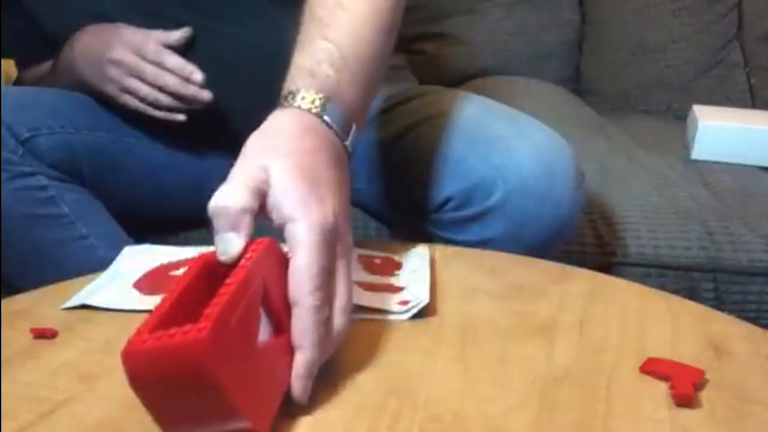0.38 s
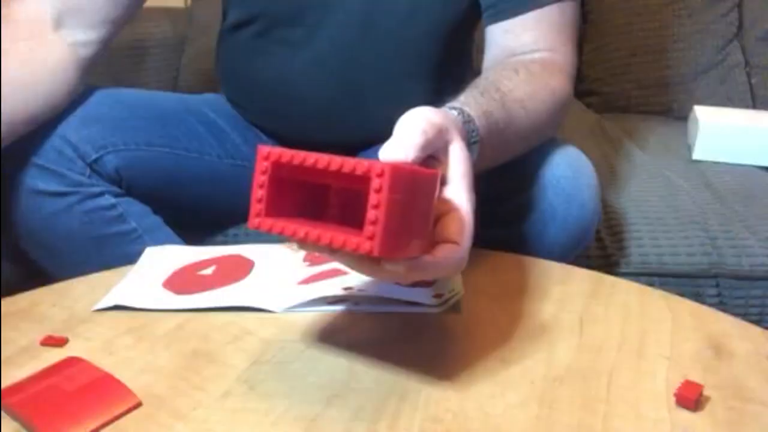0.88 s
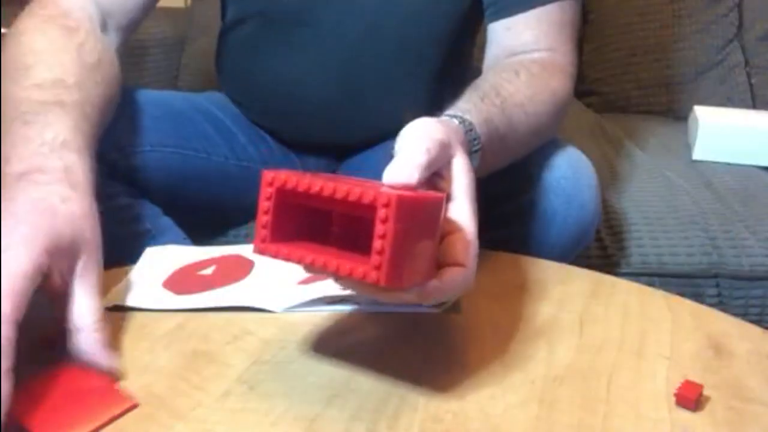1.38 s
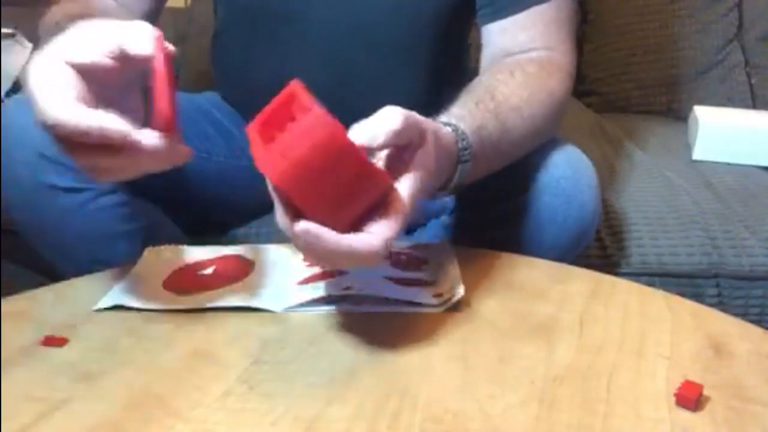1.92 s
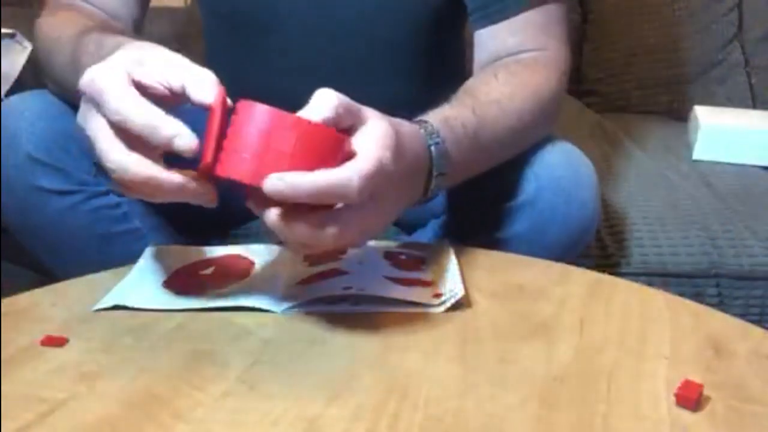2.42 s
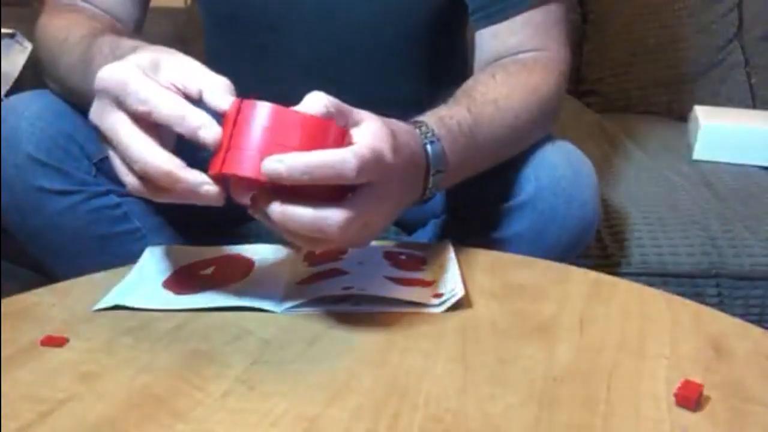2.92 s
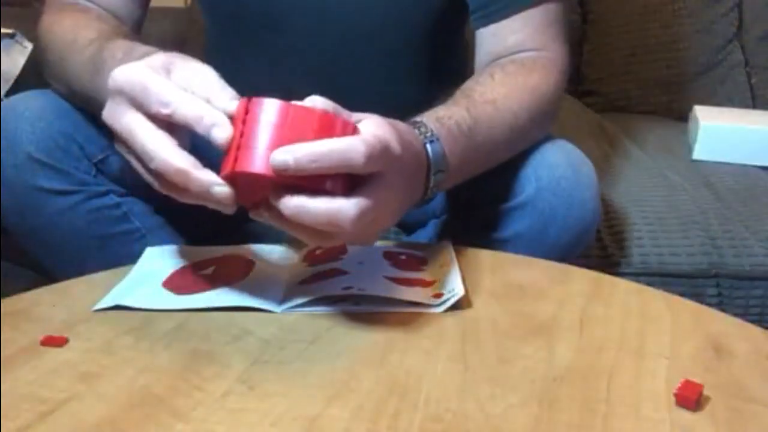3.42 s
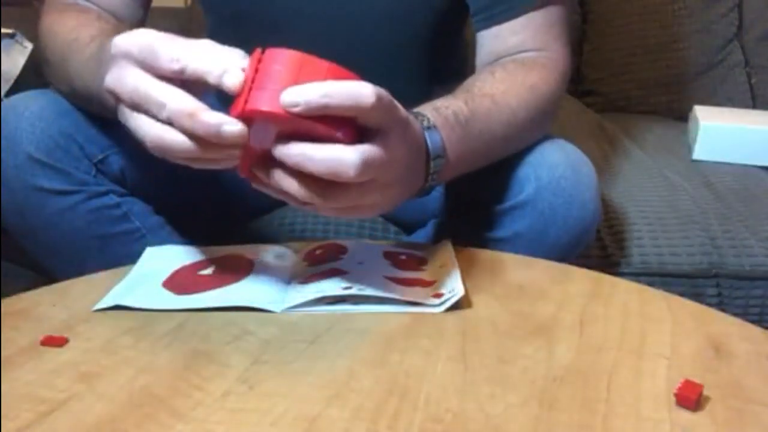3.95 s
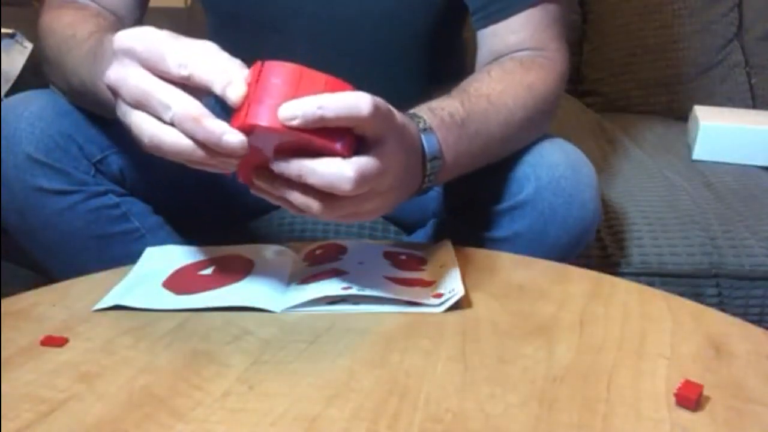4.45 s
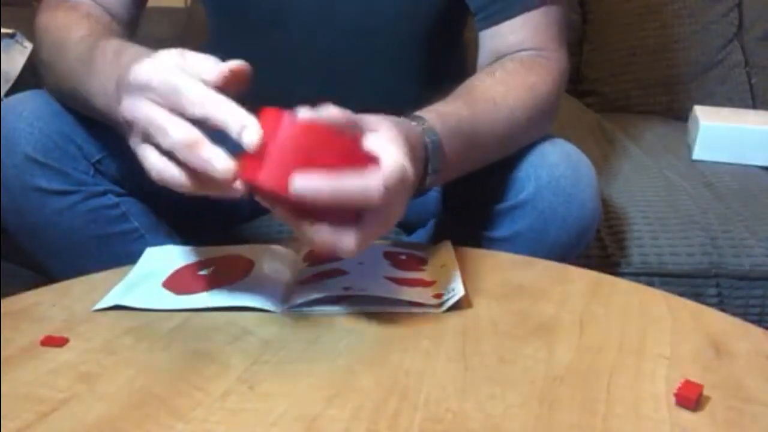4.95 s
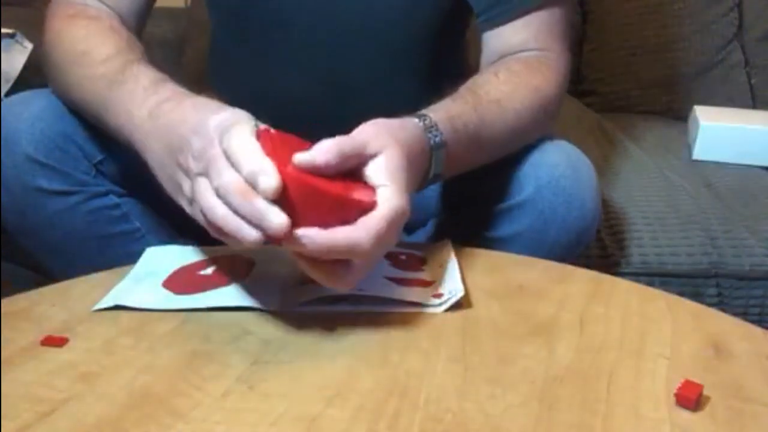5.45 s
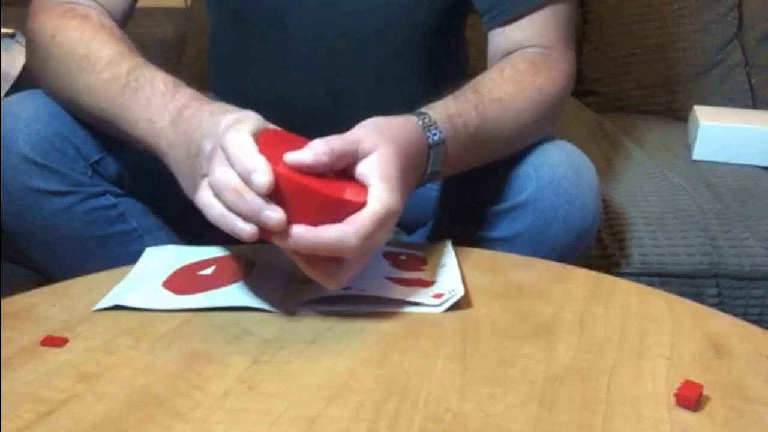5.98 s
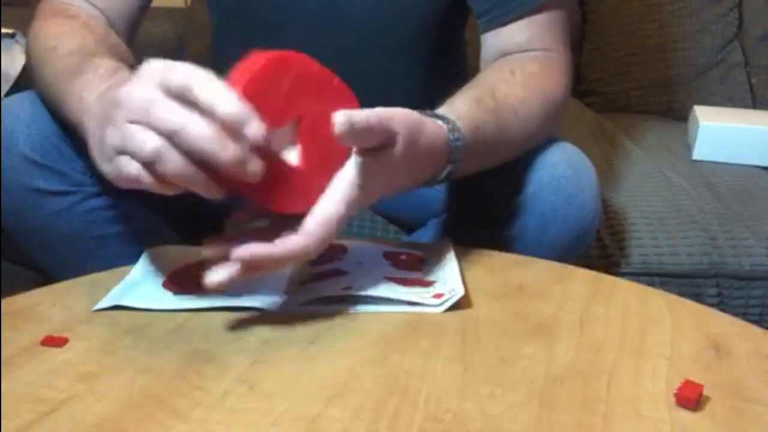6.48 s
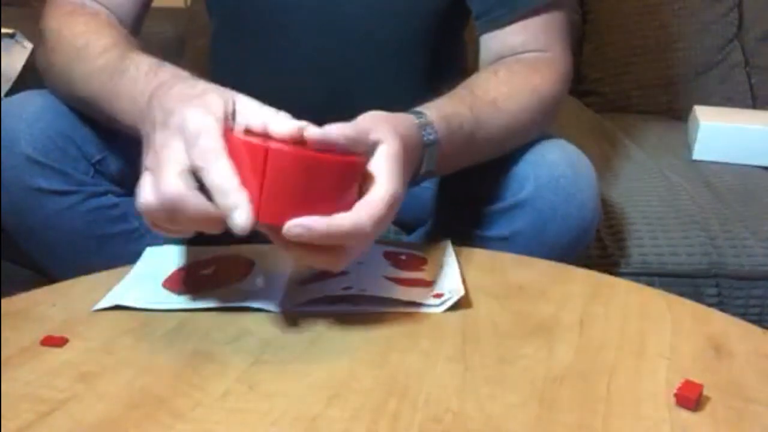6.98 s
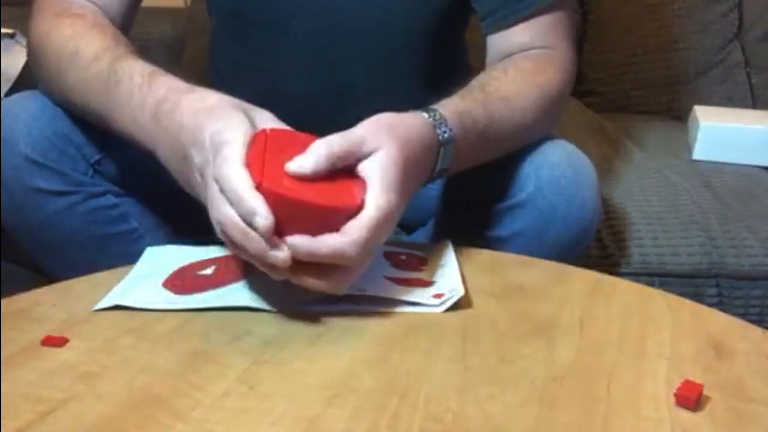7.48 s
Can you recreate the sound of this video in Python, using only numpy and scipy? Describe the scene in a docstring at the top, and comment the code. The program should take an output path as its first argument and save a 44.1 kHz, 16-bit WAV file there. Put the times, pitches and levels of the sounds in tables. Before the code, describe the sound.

A hollow plastic brick box knocks onto a wooden table, a plate rattles off, then studs click and fingers rub and squeak indoors.

```python
"""Hollow box of plastic building bricks: hands set it on a wooden table, slide a brick plate off it and press
the plate onto it. Short pushes ring the modes of table and box; dense small catches ring them as plastic
rocks and fingers rub. Squeaks are sums of partials with an unsteady slip rate, brushing is coloured grains.
Rumble (noise through room resonances) swells over a steady hiss; both step up 15 dB shortly before 1 s.
Faint low noise bands sound early on; the contacts echo in a living room."""
import sys
import numpy as np
from scipy import signal
from scipy.fft import rfft, irfft
from scipy.io import wavfile

SR = 44100
rng = np.random.default_rng(int(sys.argv[2]) if len(sys.argv) > 2 else 0)


def voltage_ratio(level):
    """Linear amplitude factor for a level in decibels (scalar or array-like)."""
    return 10 ** (np.asarray(level, float) / 20)


def int16_out(signal):
    """Quantize to a 16-bit WAV file."""
    q = np.round(np.clip(np.atleast_2d(signal).T, -1, 1) * 32767)
    wavfile.write(sys.argv[1], SR, q.astype(np.int16))


N = 336042   # samples

# Rumble, mainly under 170 Hz, level after the step: (time [s], level [dB])
RUMBLE = [(0.0, -53.5), (0.25, -65.5), (0.8, -56), (0.95, -58), (1.06, -65.5), (1.25, -44.5), (1.62, -51.5),
          (2.12, -55), (2.3, -68), (2.43, -62), (2.49, -61), (2.63, -56.5), (2.87, -53), (3.2, -68.5),
          (3.4, -68), (3.55, -60.5), (3.8, -64.5), (3.95, -55.5), (4.22, -52), (4.52, -46.5), (4.92, -61),
          (5.08, -46.5), (5.2, -75), (5.4, -51.5), (5.55, -58.5), (5.82, -45), (6.07, -56), (6.17, -66),
          (6.28, -47.5), (6.43, -77.5), (6.6, -71), (7.13, -56.5), (7.45, -55.5), (7.62, -92)]
# Room resonances, low and middle: (frequency [Hz], width [Hz], level [dB])
LOW_ROOM = [(43.6, 12, -25.5), (61.8, 8.3, -7), (77.5, 9.8, -6), (103.3, 6.7, 0), (127.1, 24, -1),
            (158.3, 12, -9.5)]
MID_ROOM = [(175, 77, -7), (209.5, 5.2, 2), (245, 71, -4), (297.5, 40, -0.5), (351, 27, -5),
            (490, 180, -10)]
# Hiss spectrum, relative: (frequency [Hz], density [dB per Hz])
HISS_SPECTRUM = [(24, -40.5), (40, -12), (81, -1), (115, -3.5), (249, -16.5), (297, -13.5), (831, -18.5),
                 (1210, -19.5), (2210, -27), (4340, -27.5), (7730, -30), (14800, -42.5), (16000, -46)]
# Swell of the faint low bands: (strongest [s], 20 dB rise [s], 20 dB fall [s], level [dB])
FAINT_BANDS_SWELL = [(.11, 0.094, 0.69, -77)]
# Faint low bands of noise: (frequency [Hz], level [dB], t60 [s])
FAINT_BANDS = [(398, -0.5, 0.043), (570, -6, .04), (690, -2.5, .05), (1200, -7, .02)]
# Skin and cloth brushing: (strongest [s], 20 dB rise [s], 20 dB fall [s], level [dB])
BRUSH = [(.23, 0.084, 0.09, -77.5), (.474, 0.074, 0.036, -80.5), (1.96, 0.33, 0.23, -63.5),
         (3.56, .05, .5, -73.5), (3.93, 0.17, 0.58, -69.5), (4.995, 0.062, .03, -60),
         (5.113, 0.025, 0.018, -54.5), (5.17, .04, 0.16, -68), (5.3, 0.064, 0.22, -65),
         (5.37, 0.13, 0.12, -66), (5.43, 0.13, 0.046, -66), (6.2, 0.18, 0.15, -62),
         (6.31, 0.078, 0.25, -65), (6.47, 0.038, .15, -70.5), (6.55, 0.12, 0.28, -59),
         (6.64, .15, 0.07, -66), (6.7, 0.07, 0.29, -68.5), (6.822, 0.026, 0.0092, -53),
         (7.0, 0.092, 0.1, -71), (7.125, 0.23, 0.053, -61.5), (7.28, 0.4, 0.57, -66)]
# Brushing spectrum, relative: (frequency [Hz], density [dB per Hz])
BRUSH_SPECTRUM = [(1500, -1.5), (3000, -8.5), (4000, 1.5), (5300, 0.5), (7000, 0), (10000, -10.5),
                  (15000, -15.5)]
# Plastic landing on the table:
# (time [s], level [dB], tilt under 700 Hz [dB], treble tilt [dB], brightest pitch [kHz])
KNOCKS = [(0.379, -43, 0, -8, 4), (0.382, -28.5, 1.5, -18, 8.5), (0.3858, -44.5, 6, -34, 3.7),
          (.404, -55, 22, -33, 4), (0.5708, -16.5, -6.5, -30.5, 4.8), (.5735, -28, -5, -31.5, 4),
          (0.5795, -37, 14, -24, 7.4), (.5875, -38, 12, -28.5, 3.8), (.675, -76, -7, -26, 4.4),
          (0.7206, -75, 9, -27, 4), (1.4425, -38.5, -10, -4, 4.1), (1.447, -41, -15, -15, 6.1),
          (1.4515, -47, -20, 2.5, 3.9), (1.4615, -56, -13, -6, 7.6), (1.455, -32.5, -3, -5, 5),
          (1.458, -30.5, -2, -11, 5.5), (1.463, -43, -18, -14, 2.5), (1.4655, -32.5, -2, -7, 4.5),
          (1.469, -27, -39, -19, 5.6), (1.4725, -46, -8, -20, 5), (1.4785, -36.5, 3, -30, 4),
          (1.489, -46, 10.5, -25, 4), (1.511, -68, 7, -25, 4)]
# Modes of the table top with the box on it, when struck: (frequency [Hz], level [dB], t60 [s])
TABLE_MODES = [(97.5, -20.5, 0.057), (159, -21.5, 0.18), (213, -11.5, 0.046), (290, -3, 0.064),
               (339, -9, 0.043), (402, -7, 0.066), (489, 0.5, 0.073), (525.5, -1.5, 0.061),
               (675, -13, 0.024), (860, -22.5, 0.025), (1070, -17.5, 0.071), (1152, -16, 0.071),
               (1200, -21.5, 0.036), (1270, 5, 0.011), (1380, -14.5, 0.045), (1575, -34, 0.096),
               (2007, -25, 0.022), (2270, -27.5, 0.014), (2420, 1, 0.0072), (3160, 0.5, 0.0035),
               (4016, -0.5, 0.0083), (4450, 0, 0.0041), (5590, -5, 0.013), (6840, -0.5, 0.0062),
               (9300, -12.5, 0.0022)]
# Plastic rocking and sliding on the table:
# (strongest [s], 20 dB rise [s], 20 dB fall [s], middle level [dB], bass level [dB])
ROCK = [(.48, 0.14, 0.21, -69, -59.5), (1.358, 0.02, 0.035, -60, -50.5), (1.447, 0.012, 0.038, -49, -64),
        (1.465, 0.03, 0.022, -36.5, -56), (1.5, 0.031, 0.06, -55.5, -39)]
# Fingers and plate dragging over the box walls:
# (strongest [s], 20 dB rise [s], 20 dB fall [s], wall tone before lumps [dB], squeaky treble [dB])
RUB = [(1.89, 0.11, 0.33, -71, -71), (2.09, 0.12, 0.15, -65, -84), (2.27, 0.079, 0.32, -71.5, -88),
       (4.997, 0.033, 0.011, -73, -65.5), (5.08, 0.044, 0.082, -75, -70), (5.37, 0.56, 0.25, -66.5, -87),
       (5.56, 0.036, 0.084, -66, -80), (5.655, 0.06, 0.08, -68, -87), (6.198, 0.066, 0.014, -55.5, -64),
       (6.303, 0.03, 0.16, -55.5, -66), (6.528, 0.074, 0.057, -51, -55), (6.59, 0.021, 0.062, -49.5, -62),
       (6.65, 0.058, 0.038, -56, -58), (6.72, 0.059, 0.1, -52, -62), (6.765, 0.035, .03, -61.5, -77),
       (6.822, 0.033, 0.025, -50.5, -47), (7.042, 0.15, 0.11, -58, -61.5), (7.116, 0.02, 0.024, -47, -49.5),
       (7.27, 0.2, 0.08, -71, -63.5)]
# Modes of the box, ungripped: (frequency [Hz], level [dB], t60 [s])
BOX_MODES = [(344, -28, 0.03), (537, -38, 0.03), (634, 2.5, 0.032), (764, -4.5, 0.043), (910, 3.5, 0.0076),
             (1060, -16.5, 0.028), (1098, -7, 0.051), (1204, -5, 0.034), (1400, -6, 0.017),
             (1583, -4.5, 0.01), (1906, -10.5, 0.013), (2270, -23, 0.037), (2560, 1, 0.0061),
             (2950, -0.5, 0.007), (3300, -4, 0.0098), (3560, -4, 0.011), (3830, -4.5, 0.01),
             (4510, -4.5, 0.0054), (4800, -16.5, 0.0034), (5060, -8, 0.011), (5490, -10.5, 0.013),
             (5896, -7.5, 0.015), (6600, -10.5, 0.011), (7030, -2, 0.0047), (7200, -24, 0.011),
             (8200, -12, .004), (10260, -43, 0.0036), (10100, -8, 0.003), (11400, -13, 0.0025),
             (14000, -16, .002)]
# Studs meeting and snapping home:
# (time [s], level [dB], tilt under 950 Hz [dB], treble tilt [dB], brightest pitch [kHz])
CLICKS = [(2.4861, -49, -2.5, -24, 5), (2.779, -55.5, -3, 8, 3.3), (2.7913, -47, 1.5, 14, 7.8),
          (2.7935, -49, 4, 15, 6.9), (2.7965, -51.5, 6.5, 12, 3.7), (2.8008, -47.5, -6, 16, 5.6),
          (2.8045, -51, 5, 2, 6.5), (2.808, -62, -5, 8, 6), (2.816, -64, -5, 14, 5.5),
          (2.823, -67, -3, 10, 4.5), (2.839, -70, -3, 12, 5.5), (3.0165, -55.5, 0, 6, 5.4),
          (3.021, -50, -5.5, -6, 4.2), (3.027, -55, -3, 0, 3.4), (3.081, -44, -7, -10, 4.3),
          (3.085, -57, -9, -20, 3), (3.0885, -43, -9, -0.5, 3.9), (3.093, -45, -2, -20, 3),
          (3.101, -54, -1, -15, 3), (3.1135, -54, 0, -18, 3), (3.121, -68, -8, -18, 3),
          (3.152, -59.5, 9, 1, 3.4), (3.2045, -55, -1.5, -4, 2.8), (3.297, -58, -13, -20, 3),
          (3.305, -42.5, -0.5, -5, 2.9), (3.3115, -39.5, 0.5, -1, 4.2), (3.317, -51, -1, -18, 3.4),
          (3.338, -63, 5, -20, 3), (3.5164, -53.5, -0.5, 1, 5.1), (3.5404, -49.5, -4, -5, 4.8),
          (3.5545, -60, 2, -19, 4), (4.2825, -45, -15, 10.5, 11), (4.284, -36, -9, 8, 5.2),
          (4.287, -47, 0, 9, 6.6), (4.3785, -36.5, -15, 10, 4.6), (4.3792, -31.5, -15, 1, 2.7),
          (4.3822, -30.5, -30, -17, 2.1), (4.4874, -47.5, -2.5, 1, 4.5), (4.5966, -48.5, -6, -13, 6.3),
          (4.858, -50.5, -4.5, -15, 3.5), (4.917, -61, -17, 7, 4.8), (5.097, -62, -23, 16, 11),
          (5.0995, -60, -20, 9, 4.3), (5.104, -51.5, -24, -20, 4), (5.109, -55, -16, 8, 11),
          (5.1125, -46, -13, 1.5, 6.7), (5.1155, -59, -20, 11, 3.6), (5.1185, -69, -21, 5, 5.1),
          (5.124, -61, -23, -11, 3.4), (5.5453, -49, -1, -24, 1.33), (5.588, -51, -2, -6, 4.8),
          (5.654, -47, -11, -32, 4), (5.8168, -33.5, -6, -5, 4), (5.8261, -24.5, -5.5, 0.5, 5.33),
          (5.848, -57, -2, -6, 4.5), (5.862, -44, -3, -13, 4.4), (5.89, -56, 3, -15, 3),
          (7.0347, -55.5, -21, 22.5, 12.3)]
# Fingertip squeaking along a wall: (strongest [s], 20 dB rise [s], 20 dB fall [s], level [dB],
# mean slip rate [Hz], tilt [dB per partial])
SQUEAK = [(6.31, .03, .06, -61, 1330, -7), (6.4, 0.06, .04, -61, 1314, -8),
          (6.49, 0.05, 0.077, -58.5, 1270, -1.5), (6.525, 0.042, 0.045, -54, 1305, 1),
          (6.585, 0.023, 0.027, -60, 1270, 3.5), (6.605, 0.046, 0.045, -61, 1350, 1),
          (6.645, 0.045, .03, -64.5, 1200, 4), (6.7, 0.028, 0.046, -60, 1430, -0.5)]
# Multiples 1 to 5 of the slip rate, before tilt and flutter: level [dB]
SQUEAK_PARTIALS_DB = [-14, -5, -3, 0, -16]

HISS_DB = -61   # after the step
STEP_S, BEFORE_STEP_DB = .858, -15
UPPER_RUMBLE_DB, UPPER_FOLLOWS = -65, 0.75   # middle range with the low at -58 dB; its share of the swing
KNOCK_CONTACT_MS, CLICK_CONTACT_MS = 4.9, 2.7   # for a mode at 1 kHz
TREBLE_BREVITY = 0.1   # exponent: contact shortens with pitch
TABLE_LONGEST_T60_S, GRIPPED_LONGEST_T60_S = .2, 0.027   # palms damp the box
TREBLE_FROM_HZ, TREBLE_CHATTER, TREBLE_SCATTER_DB = 2300, .85, 2.0
BELOW_DB_PER_OCTAVE, ABOVE_DB_PER_OCTAVE = 13, 14   # treble falls off around its brightest pitch
ONSET_CYCLES = .6
ROCK_TREBLE_DB = -29   # relative to the middle
ROOM_T60_S, ROOM_TREBLE_T60_S = 0.29, 0.25
ROOM_DB = -13   # gain on a tail of energy 4
BLUR_SHARE = .8
TOP_HZ = 16500


def rms_one(x):
    """Scale to unit rms."""
    return x / np.sqrt(np.mean(x ** 2) + 1e-20)


def strokes(rows):
    """Gain over time per level column: each stroke rises and falls evenly in dB."""
    strongest_s, rise_s, fall_s, *levels_db = np.transpose(rows)[:, :, None]
    late_s = np.arange(N) / SR - strongest_s
    rising = -late_s / np.maximum(rise_s, .005)
    falling = late_s / np.maximum(fall_s, .005)
    shape_db = -20 * np.where(late_s < 0, rising, falling)
    return [voltage_ratio(np.maximum(db + shape_db, -200)).sum(axis=0) for db in levels_db]


def drift(rate_hz):
    """Low-passed noise of spread 1, computed at every 40th sample."""
    r = np.exp(-80 * np.pi * rate_hz / SR)
    white = rng.standard_normal(N // 40 + 2002)
    slow = signal.lfilter([1], [1, -2 * r, r * r], white)[2000:]   # settled part
    return np.interp(np.arange(N) / 40, np.arange(len(slow)), rms_one(slow))


def ring(force, hz, t60_s):
    """Damped resonator: a unit click rings a sine of height 1; t60 at least 2 ms."""
    r = voltage_ratio(-60 / (max(t60_s, .002) * SR))
    w = 2 * np.pi * hz / SR
    return signal.lfilter([0, np.sin(w)], [1, -2 * r * np.cos(w), r * r], force + 1e-18)


def coloured(spectrum, white):
    """Shape white input by a spectrum on a log-frequency axis; unit rms."""
    hz, db = np.transpose(spectrum)
    log_hz = np.log(np.arange(1, N // 2 + 2) * SR / N)
    return rms_one(irfft(rfft(white) * voltage_ratio(np.interp(log_hz, np.log(hz), db)), N))


def grains(per_s, spread_db):
    """Random tiny impacts of uneven size and either sign; unit rms."""
    sizes = voltage_ratio(spread_db * np.minimum(rng.exponential(1, N), 4)) * rng.choice([-1, 1], N)
    return rms_one(sizes * (rng.random(N) < per_s / SR))


def struck(events, modes, contact_ms, longest_t60_s, bass_hz, deep_hz, soft_hz, scatter_db, rough):
    """Contacts push each mode by an onset plus swelling chatter; gives body thud and treble snap."""
    time_s, level_db, bass_db, treble_db, bright_khz = np.transpose(events)
    after = np.arange(-400, 600)   # samples around the contact
    at = np.round(time_s * SR).astype(int)[:, None] + after
    body, snap = np.zeros(N), np.zeros(N)
    for hz, mode_db, t60_s in modes:
        high = hz > TREBLE_FROM_HZ
        octaves = np.log2(hz / (1000 * bright_khz))
        falloff_db = np.maximum(ABOVE_DB_PER_OCTAVE * octaves, -BELOW_DB_PER_OCTAVE * octaves)
        if hz < bass_hz:
            tilt_db = bass_db
        else:
            tilt_db = treble_db - falloff_db if high else 0

        # higher modes are driven for a shorter time
        spread = contact_ms * SR / 1000 * (1000 / hz) ** TREBLE_BREVITY
        side = np.where(after < 0, .25 if high else .4, 1)
        swell = np.exp(-(np.abs(after) / (spread * side)) ** 1.5)
        swell = swell / np.sqrt(np.sum(swell ** 2))
        chance = rng.standard_normal((len(time_s), len(after)))

        # a mode needs a moment to build up
        cycles = hz * after / SR
        onset = np.exp(-.5 * (cycles / ONSET_CYCLES) ** 2)
        onset = 2 * onset * np.cos(2 * np.pi * cycles) / onset.sum()
        chatter = TREBLE_CHATTER if high else rough
        push = chatter * swell * chance + (1 - chatter) * onset

        # even out the drive at the mode's pitch, within limits
        share = np.abs(push @ np.exp(2j * np.pi * cycles))
        push = push / np.clip(share, .45, 3)[:, None]
        # each contact touches another spot of the body
        spot_db = (TREBLE_SCATTER_DB if high else scatter_db) * chance[:, 0]
        force = np.zeros(N)
        np.add.at(force, at, push * voltage_ratio(level_db + mode_db + tilt_db + spot_db)[:, None])
        part = snap if high else body
        part += ring(force, hz, min(t60_s, longest_t60_s))
    # yielding contact limits the top; a small body sends out no deep bass
    soft = signal.butter(3, [deep_hz, soft_hz], "band", fs=SR, output="sos")
    crisp = signal.butter(2, 1500, "high", fs=SR, output="sos")
    return signal.sosfilt(soft, body), signal.sosfilt(crisp, snap)


def scraped(modes, catches, effort, low_hz, high_hz, sustain, grip_db):
    """Catches sound the modes, a shifting grip frees now one, now another; unit effort gives rms 1."""
    steady = played = 0
    for k, (hz, db, t60_s) in enumerate(modes):
        free = voltage_ratio(db + grip_db * drift(2.6)) * catches
        if low_hz < hz < high_hz:
            rung = (-1) ** k * ring(np.array([free, effort * free]), hz, sustain * t60_s)
            steady = steady + rung[0]
            played = played + rung[1]
    return played / np.std(steady)


def rumble():
    """Noise, lumpy in both ranges at once, through the room's resonances."""
    lumps_db = 3.3 * drift(10.2) + 1.5 * drift(30)
    low_db = np.interp(np.arange(N) / SR, *np.transpose(RUMBLE))
    upper_db = UPPER_RUMBLE_DB + UPPER_FOLLOWS * (low_db + 58)
    out = 0
    for level_db, resonances in ((low_db, LOW_ROOM), (upper_db, MID_ROOM)):
        white = rng.standard_normal(N) * voltage_ratio(lumps_db)
        band = 0
        for k, (hz, width_hz, db) in enumerate(resonances):
            band = band + (-1) ** k * voltage_ratio(db) * rms_one(ring(white, hz, 2.2 / width_hz))
        out = out + voltage_ratio(level_db) * rms_one(band)
    return out


def hiss():
    """Steady air and microphone noise: shaped white noise."""
    return voltage_ratio(HISS_DB) * coloured(HISS_SPECTRUM, rng.standard_normal(N))


def background():
    """Rumble and hiss, both fainter before the step."""
    level_db = BEFORE_STEP_DB * (np.arange(N) < STEP_S * SR)
    return voltage_ratio(level_db) * (rumble() + hiss())


def faint_bands():
    """One swell of noise through low resonances."""
    effort = strokes(FAINT_BANDS_SWELL)[0]
    return scraped(FAINT_BANDS, rng.standard_normal(N), effort, 200, 2000, sustain=1.0, grip_db=0)


def brushing():
    """Skin and cloth: dense coloured grains in strokes."""
    return strokes(BRUSH)[0] * coloured(BRUSH_SPECTRUM, grains(9000, spread_db=3.5))


def landing():
    """Plastic strikes the table's modes; gives thud and tick."""
    return struck(KNOCKS, TABLE_MODES, KNOCK_CONTACT_MS, TABLE_LONGEST_T60_S, bass_hz=700, deep_hz=70,
                  soft_hz=1950, scatter_db=1.0, rough=0.2)


def room(x):
    """Dense reflections from 6 ms on; soft furniture takes the treble sooner."""
    s = np.arange(int(.4 * SR)) / SR
    white = rng.standard_normal(len(s)) * (s > .006)
    low = signal.sosfilt(signal.butter(2, 2500, fs=SR, output="sos"), white)
    tail = low * voltage_ratio(-60 * s / ROOM_T60_S) + (white - low) * voltage_ratio(-60 * s / ROOM_TREBLE_T60_S)
    tail = tail / np.sqrt(np.sum(tail ** 2) / 4)
    return voltage_ratio(ROOM_DB) * signal.fftconvolve(x, tail)[:N]


def rocking():
    """Sliding plastic drives the table's low, middle and high modes."""
    catches = grains(4000, spread_db=2.5)
    middle, bass = strokes(ROCK)
    treble = voltage_ratio(ROCK_TREBLE_DB) * middle
    out = 0
    for effort, low_hz, high_hz in ((bass, 200, 700), (middle, 700, 2300), (treble, 2300, 10000)):
        out = out + scraped(TABLE_MODES, catches, effort, low_hz, high_hz, sustain=0.55, grip_db=0)
    return out


def rubbing():
    """Skin sticks and slips on the box walls; the low wall tone comes in lumps."""
    catches = grains(4000, spread_db=2.0) * voltage_ratio(2.0 * drift(80))
    tone, treble = strokes(RUB)
    bright = scraped(BOX_MODES, catches, treble, 2300, 6200, sustain=1.0, grip_db=3.0)
    lumpy = tone * voltage_ratio(3.0 * drift(60) - 2)
    return scraped(BOX_MODES, catches, lumpy, 950, 2300, sustain=0.47, grip_db=3.5) + bright


def clicking():
    """Studs strike the modes of the gripped box."""
    body, snap = struck(CLICKS, BOX_MODES, CLICK_CONTACT_MS, GRIPPED_LONGEST_T60_S, bass_hz=950,
                        deep_hz=200, soft_hz=3160, scatter_db=1.0, rough=0.8)
    return body + snap


def squeaking():
    """Regular slips with an unsteady rate; every partial flutters on its own."""
    unsteady = 1 + .008 * drift(12) + .012 * drift(150)
    flutter = [voltage_ratio(db + 3.9 * drift(40)) for db in SQUEAK_PARTIALS_DB]
    out = 0
    for *stroke, slip_hz, tilt_db in SQUEAK:
        phase = 2 * np.pi * slip_hz * np.cumsum(unsteady) / SR
        tone = 0
        for k, gain in enumerate(flutter):
            tone = tone + gain * voltage_ratio(tilt_db * (k - 1)) * np.sin((k + 1) * phase)
        out = out + strokes([stroke])[0] * tone
    return out


def scene():
    """Bricks and table in the room, over rumble and hiss."""
    thud, tick = landing()
    clicks = clicking()
    brush = brushing()
    noise = faint_bands() + background()
    # fast random modulation blurs the pitches in the echo
    blurred = clicks * (1 - BLUR_SHARE + BLUR_SHARE * drift(400))
    echoes = room(blurred + 0.03 * thud + 0.6 * tick)
    friction = rocking() + rubbing() + squeaking() + brush
    return (thud + tick + clicks + echoes + friction + noise)[None]


def top_cut(x):
    """Nothing passes above the cut-off."""
    return signal.sosfilt(signal.butter(12, 16360, fs=SR, output="sos"), x)


def record(dry):
    """A steep low-pass cuts the top."""
    low_pass = signal.cheby2(10, 50, TOP_HZ, fs=SR, output="sos")
    mix = signal.sosfilt(low_pass, dry)
    return top_cut(mix)


dry = scene()
out = record(dry)
int16_out(out)
```